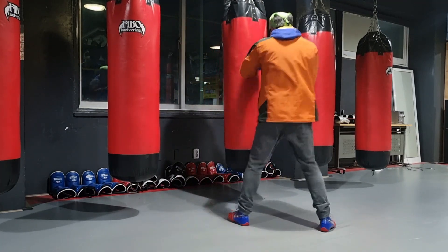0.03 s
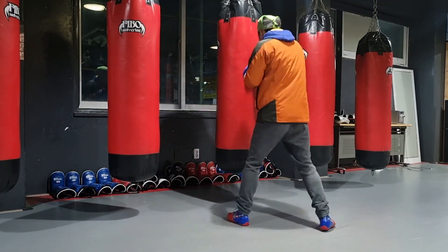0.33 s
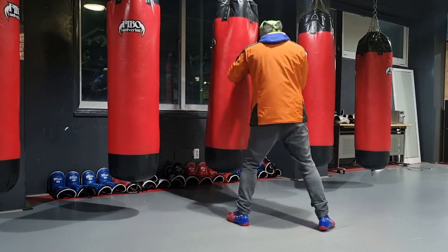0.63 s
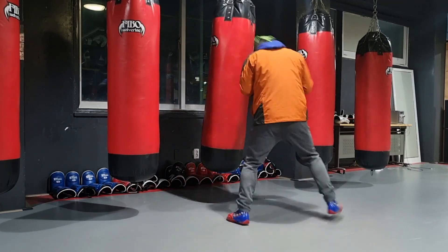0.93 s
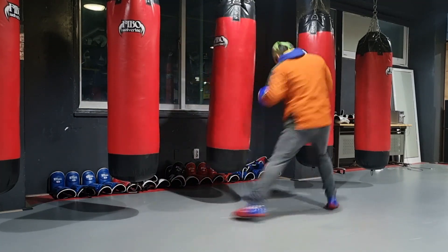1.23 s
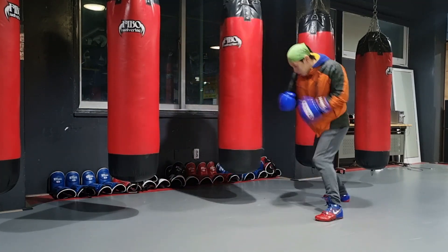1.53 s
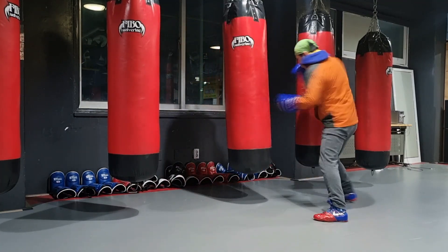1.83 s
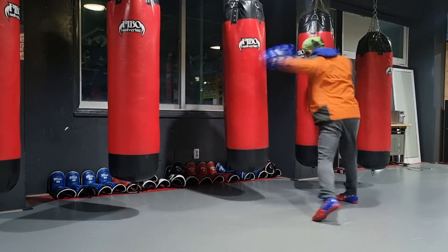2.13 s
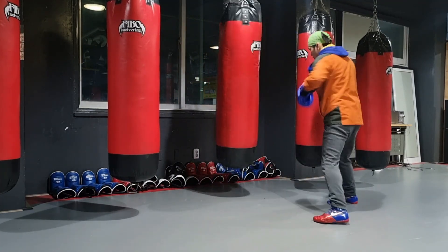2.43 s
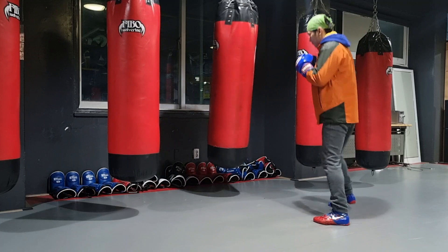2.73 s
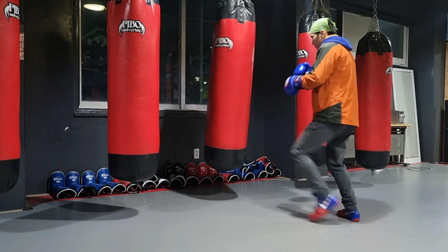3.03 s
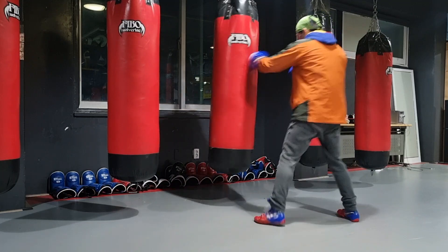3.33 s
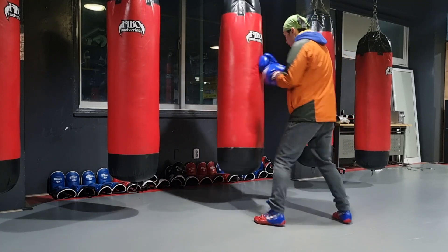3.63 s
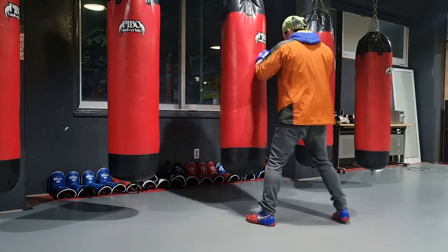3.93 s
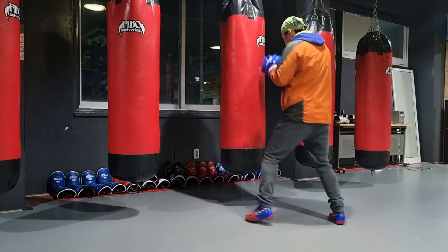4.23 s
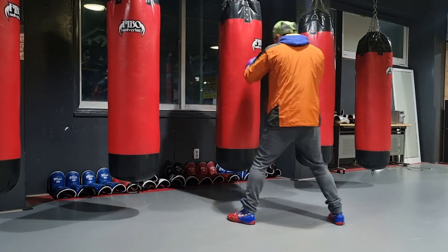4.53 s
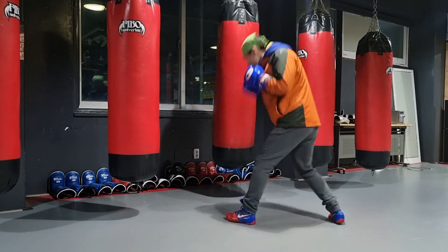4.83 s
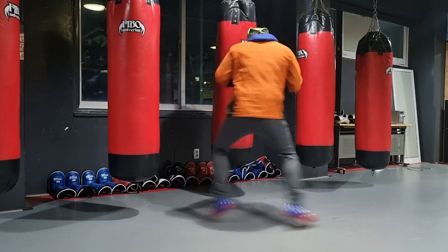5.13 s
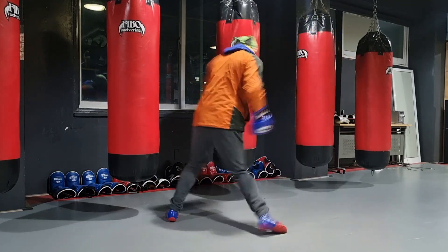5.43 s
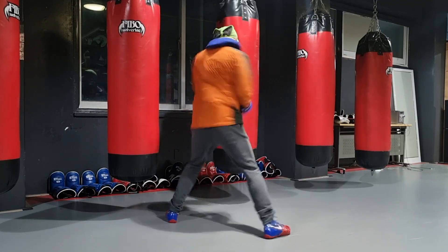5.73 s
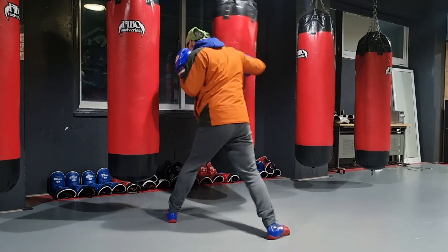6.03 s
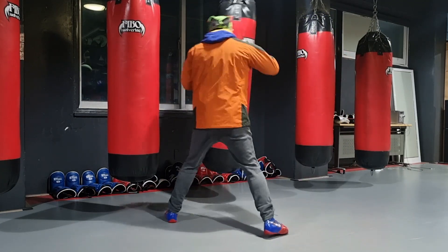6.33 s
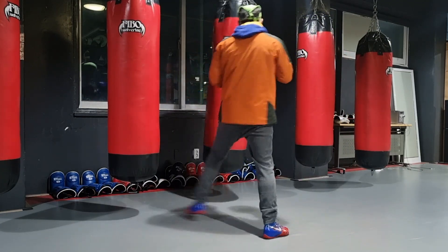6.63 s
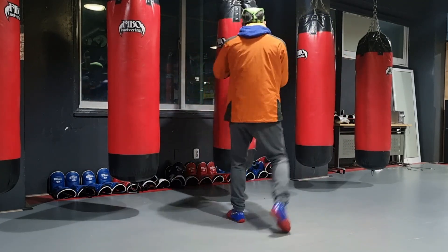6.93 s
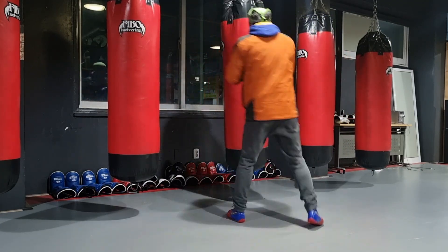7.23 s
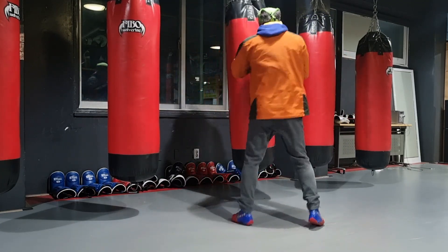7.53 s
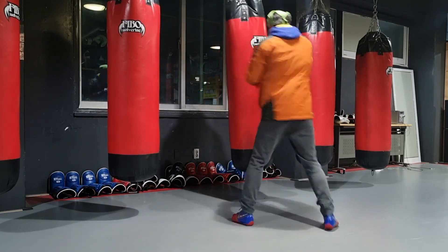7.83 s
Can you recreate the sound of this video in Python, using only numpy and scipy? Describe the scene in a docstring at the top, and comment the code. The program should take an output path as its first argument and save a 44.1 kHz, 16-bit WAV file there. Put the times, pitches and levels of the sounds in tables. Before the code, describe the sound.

A boxer works a hanging heavy bag in an empty gym. Three soft jabs lead to two hard punches, each a low thud with a vinyl slap and faint chain ring. More light jabs follow, then a loud step, a second hard pair and soft jabs to finish. Shoes tap and scuff and a jacket swishes between blows. The hall echoes, longest in the bass, over faint air noise.

```python
"""An empty gym: a boxer works a hanging heavy bag with light jabs and, twice, a pair of hard punches.
Each blow pushes a low thud out of the bag, slaps glove on vinyl and sets the chain ringing faintly;
the hall rings on, longest in the bass. Between blows his shoes tap and scuff on the floor and his
jacket swishes, over faint steady air noise."""
import sys
import numpy as np
from scipy import signal
from scipy.fft import rfft, irfft
from scipy.io import wavfile
from scipy.ndimage import uniform_filter1d

SR = 44100
rng = np.random.default_rng(int(sys.argv[2]) if len(sys.argv) > 2 else 0)


def persist_wave(psi):
    """Save psi, clipped to +-1, as 16-bit WAV."""
    counts = np.round(np.clip(psi, -1, 1) * 32767).astype(np.int16)
    wavfile.write(sys.argv[1], SR, np.atleast_2d(counts).T)


N = 355887
RING_SAMPLES = 2 * SR  # length of one blow
T = np.arange(RING_SAMPLES) / SR

# sole friction spectrum: freq_hz, density_db
SCUFF_SPECTRUM = [(150, -27.5), (350, 1.5), (650, 1.5), (1100, -3.5), (2200, -9), (4000, -16.5),
                  (8000, -25)]
# cloth friction spectrum: freq_hz, density_db
CLOTH_SPECTRUM = [(1200, -5.5), (3000, 0), (6000, -4), (9000, -4), (11300, -7.5), (13000, -2.5),
                  (16000, -6.5)]


def gain(db):
    """Decibels to amplitude factor."""
    return 10 ** (np.asarray(db) / 20)


def unit_rms(x):
    """Scale to rms 1."""
    return x / np.sqrt(np.mean(x ** 2) + 1e-20)


def at_level(x, db):
    """Scale so the first 0.1 s has this rms level."""
    return gain(db) * x / np.sqrt(np.mean(x[..., :SR // 10] ** 2) + 1e-20)


def lookup(points, hz):
    """Interpolate a table over log frequency."""
    points_hz, values = np.transpose(points)
    return np.interp(np.log(hz + 1), np.log(points_hz + 1), values)


def add(mix, start_s, sound):
    """Add a stereo sound into the mix."""
    part = mix[:, max(round(start_s * SR), 0):][:, :sound.shape[1]]
    part += sound[:, :part.shape[1]]


def convolve(x, response):
    """Convolve, keeping the length of x."""
    x = np.atleast_2d(x)
    return signal.fftconvolve(x, np.atleast_2d(response), axes=1)[:, :x.shape[1]]


def colour(x, spectrum, size=2048):
    """Minimum-phase filter; falls 10 dB per octave beyond the table."""
    hz = abs(np.fft.fftfreq(size, 1 / SR)) + 1
    octaves_out = np.log2(hz / np.clip(hz, spectrum[0][0], spectrum[-1][0]))
    log_gain = np.log(gain(lookup(spectrum, hz) - 10 * abs(octaves_out)))
    response = np.fft.ifft(np.exp(np.conj(signal.hilbert(log_gain)))).real
    return signal.oaconvolve(x, response[None], axes=1)[:, :x.shape[1]]


def diffuse(samples):
    """White noise from all around: left and right alike only in the bass."""
    # left-right likeness: freq_hz, correlation
    likeness = [(40, 1), (120, 0.96), (250, 0.85), (500, 0), (1000, 0), (3000, 0)]
    a, b = rfft(rng.standard_normal((2, samples)))
    correlation = lookup(likeness, np.fft.rfftfreq(samples, 1 / SR))
    mid, side = a * np.sqrt((1 + correlation) / 2), b * np.sqrt((1 - correlation) / 2)
    return irfft([mid + side, mid - side], samples)


def room_air(level_db=-58):
    """Steady air noise of the hall."""
    # air noise spectrum: freq_hz, density_db
    spectrum = [(15, -44), (25, -6), (96, 2.5), (148, -7), (378, -7), (848, -15), (1140, -13),
                (2120, -18.5), (3090, -21.5), (9300, -32.5), (11200, -39), (12500, -32), (15500, -34)]
    return gain(level_db) * unit_rms(colour(diffuse(N), spectrum))


def tail_fade(t, t60_s, steepening=1.092):
    """The reverberant tail fades, its decay steepening slightly as it dies."""
    return np.exp(-np.log(1000) * (t / t60_s) ** steepening)


def hall_tail(build_up_s):
    """Diffuse echoes, each band dying at its own rate."""
    # reverberation time: freq_hz, t60_s
    decay_times = [(40, 2.6), (90, 1.59), (200, 1.45), (300, 1.35), (420, 0.81), (600, 0.61), (1500, 0.93),
                   (3000, 0.8), (6000, 0.69), (10000, 0.48), (16000, 0.58)]
    # tail colour: freq_hz, gain_db
    spectrum = [(40, 7.6), (100, 7.7), (170, 7.35), (260, 7.2), (600, 1.5), (1100, 1.9), (2200, 4),
                (6000, 5.7), (15000, 1.5)]
    hz, t, bands = signal.stft(diffuse(RING_SAMPLES), SR, nperseg=1024)
    t60_s = lookup(decay_times, hz)[:, None]
    fade = tail_fade(t, t60_s) * np.sqrt(10 / (t60_s * SR))  # about unit energy per band
    bands = bands * fade * gain(lookup(spectrum, hz))[:, None]
    tail = signal.istft(bands, SR, nperseg=1024)[1][:, :RING_SAMPLES]
    return tail * (1 - np.exp(-(T / build_up_s) ** 2))


def in_hall(x, tail, wet_db, left_lag_s=0.00036):
    """Direct sound, right side first, plus the hall."""
    direct = np.array([np.roll(x, round(left_lag_s * SR)), x])
    return direct + gain(wet_db) * convolve(x, tail)


def rubbing(spectrum, grain_db):
    """Friction noise in small uneven catches."""
    catches = unit_rms(uniform_filter1d(rng.standard_normal(N), 130))
    return unit_rms(colour(diffuse(N) * gain(grain_db * catches), spectrum))


def footwork(tail, grip_s=0.012, load_s=0.044, cloth_db=-10):
    """Soles grip, body weight follows; the jacket swishes with each step and sleeve sweep."""
    # a foot lands and slides to rest: start_s, scuff_db, weight_db, settle_s
    steps = [(0.98, -59, -62, 0.24), (1.175, -52.5, -50.5, 0.21), (1.5, -48.5, -62, 0.24),
             (1.554, -48, -37.5, 0.19), (3.01, -55.5, -58, 0.12), (4.93, -58, -74, 0.51),
             (5.309, -46.5, -56, .08), (5.384, -44, -40.5, 0.17), (6.905, -59, -60, 0.16)]
    # sleeve sweeps: centre_s, level_db, half_width_s
    sleeves = [(0.034, -63.5, 0.046), (0.92, -68, .05), (1.345, -69, 0.044), (1.65, -52.5, 0.04),
               (2.226, -44.5, 0.033), (2.388, -43.5, 0.085), (3.046, -57, 0.019), (4.1, -59, 0.034),
               (4.385, -58.5, 0.033), (4.805, -71, 0.045), (5.175, -58.5, 0.036), (5.512, -45.5, 0.021),
               (6.05, -58, 0.028), (6.634, -60.5, 0.036)]
    # loaded floor spectrum: freq_hz, density_db
    floor_spectrum = [(25, -32), (50, 1), (85, 0.5), (130, -7.5), (260, -7), (450, -20)]
    t, scuff, weight = np.arange(N) / SR, np.zeros(N), np.zeros(N)
    for start_s, scuff_db, weight_db, settle_s in steps:
        age_s = np.maximum(t - start_s, 0)
        settling = np.exp(-age_s / settle_s)
        scuff += gain(scuff_db) * (1 - np.exp(-age_s / grip_s)) * settling
        weight += gain(weight_db) * (1 - np.exp(-age_s / load_s)) * settling
    sweeps = sum(gain(db) * np.exp(-((t - centre_s) / half_width_s) ** 2)
                 for centre_s, db, half_width_s in sleeves)
    soles = weight * rubbing(floor_spectrum, grain_db=1.5) + scuff * rubbing(SCUFF_SPECTRUM, grain_db=1)
    jacket = (gain(cloth_db) * scuff + sweeps) * rubbing(CLOTH_SPECTRUM, grain_db=3.5)
    return soles + jacket + gain(-5) * convolve(jacket, tail)


def squeaks(tail, waver=0.034):
    """Rubber, vinyl and chain links stick and slip in brief wavering whistles."""
    # stick-slip events: start_s, pitch_hz, level_db, length_s, wet_db
    slips = [(1.026, 5140, -59, 0.011, -19), (1.438, 14200, -70, 0.034, -8),
             (2.743, 9260, -55, 0.011, -4.5), (3.428, 4740, -33.5, 0.0013, -21),
             (5.506, 6260, -39.5, 0.0096, -16), (6.509, 9470, -63.5, 0.016, 1)]
    mix, t = np.zeros((2, N)), T[:SR // 2]
    for start_s, pitch_hz, level_db, length_s, wet_db in slips:
        jitter = unit_rms(uniform_filter1d(rng.standard_normal(len(t)), 20))
        phase = 2 * np.pi * np.cumsum(pitch_hz * (1 + waver * jitter)) / SR
        whistle = np.exp(-((t - length_s) / length_s) ** 2) * np.sin(phase)
        add(mix, start_s, gain(level_db) * in_hall(whistle, tail, wet_db))
    return mix


def contact(decay_s, snap=5.6):
    """One snap, then a dying spray of tiny impacts; flat spectrum."""
    t = T[:4096]
    envelope = np.exp(-t / decay_s) * (1 - np.exp(-t * 10 / decay_s))
    x = rng.standard_normal(len(t)) * envelope
    for _ in range(4):  # impose envelope and flat spectrum in turn
        x = x * envelope / np.sqrt(abs(uniform_filter1d(x ** 2, 64)) + 1e-12)
        x[10] -= snap
        x = irfft(np.exp(1j * np.angle(rfft(x))))
    return np.pad(x * np.exp(-(t / (6 * decay_s)) ** 2), (0, RING_SAMPLES - len(t)))


def taps(tail, tap_trim_db=-10, tick_trim_db=-13):
    """Light contacts of shoes, gloves and bag: a dull tap under a bright tick."""
    # contacts, before trim: start_s, tick_db, tap_db
    touches = [(1.037, -50.5, -49.5), (1.172, -48, -43.5), (1.495, -55, -48), (1.5576, -46, -42.5),
               (2.221, -43, -35.5), (3.4286, -42, -40.5), (3.667, -52, -59), (3.9603, -50.5, -50),
               (4.2076, -50, -50.5), (4.3844, -52, -50), (4.5486, -45.5, -42.5), (5.151, -50, -49.5),
               (5.312, -47, -42.5), (5.3931, -32, -34), (6.911, -54, -49.5), (7.3314, -53, -54),
               (7.414, -51, -53), (7.6006, -48, -51)]
    # tap and tick spectra: freq_hz, density_db
    tap_spectrum = [(150, -22.5), (350, -0.5), (600, 3.5), (1200, -7.5), (2500, -18), (5000, -24)]
    tick_spectrum = [(1500, -30), (3200, 10), (5000, 6.5), (7000, 2.5), (11000, -5.5), (13000, -11),
                     (16000, 0.5)]
    mix = np.zeros((2, N))
    for start_s, tick_db, tap_db in touches:
        touch = contact(decay_s=0.00207)[:SR // 2]
        tap = colour(in_hall(touch, tail, wet_db=5), tap_spectrum)
        tick = colour(in_hall(touch, tail, wet_db=0.5), tick_spectrum)
        add(mix, start_s, at_level(tap, tap_db + tap_trim_db) + at_level(tick, tick_db + tick_trim_db))
    return mix


def fittings():
    """Chain and bracket ring, with random strength and phase per blow."""
    # metal modes: pitch_hz, relative_db, t60_s
    modes = [(2045, -7, 0.45), (2550, -21, 1), (2520, -20.5, 0.95), (2590, -31, .8), (2660, -13.5, 0.31),
             (2965, -8, 0.38), (3020, -17, 0.87), (3250, -23, 0.59), (3340, -14, 0.5), (9150, -20, 0.46),
             (13400, -23, .4)]
    t, ring = T[:SR], np.zeros((2, SR))
    for pitch_hz, relative_db, t60_s in modes:
        phase_cycles, strength = rng.random((2, 1)), 0.5 + rng.random()
        envelope = strength * gain(relative_db) * np.exp(-np.log(1000) * t / t60_s)
        ring += envelope * np.sin(2 * np.pi * (pitch_hz * t + phase_cycles))
    return ring


def squeezed_air(lead_s=0.028, rise_s=0.0061):
    """Air hisses out between glove and bag, swelling until they meet."""
    t = T[:round(lead_s * SR)]
    hiss = colour(diffuse(len(t)), CLOTH_SPECTRUM) + 3 * colour(diffuse(len(t)), SCUFF_SPECTRUM)
    return unit_rms(hiss) * np.exp((t - lead_s) / rise_s)


def air_pop(x, pitch_hz, width_hz=217):
    """Air trapped between glove and bag resonates briefly."""
    b, a = signal.iirpeak(pitch_hz, pitch_hz / width_hz, fs=SR)
    return signal.lfilter(b, a, signal.lfilter(b, a, x))


def bag_push(pitch_hz, swell_s, delay_s):
    """The bag's skin caves in, then bulges out in a few dying swings."""
    return np.sin(2 * np.pi * pitch_hz * (T - delay_s)) * T / swell_s * np.exp(1 - T / swell_s)


def bag_thud(tail, mode_rise_s=0.024):
    """The bag's low push, reflected by walls and held by standing waves."""
    # wall reflections: delay_s, gain_db
    walls = [(0.03, -13), (0.052, -8.5), (0.063, -6), (0.081, -3)]
    # standing waves of the hall: pitch_hz, level_db, t60_s
    modes = [(55.4, -22, 3.4), (61.5, -16, 2.95), (77.7, -20, 2), (95.5, -15.5, 1.8), (103.8, -21.5, 1.2),
             (169.2, -29.5, 1.3), (253, -36.5, 2)]
    # thud colour: freq_hz, gain_db
    spectrum = [(25, -10), (50, -1), (90, 1), (125, -0.5), (165, 0), (230, 4.5), (500, -3)]
    push = bag_push(pitch_hz=92.5, swell_s=0.0055, delay_s=0.0042)
    echoes = sum(gain(db) * np.interp(T - delay_s, T, push, left=0) for delay_s, db in walls)
    standing = sum(gain(db) * tail_fade(T, t60_s) * np.sin(2 * np.pi * hz * (T - 0.003))
                   for hz, db, t60_s in modes)
    standing *= 1 - np.exp(-T / mode_rise_s)
    return colour(in_hall(push, tail, wet_db=-2.5) + echoes + standing, spectrum)


def punch(slap_db, contact_s, thud_db, pop_hz, pop_db, wet_db, full_blow_db=-24.5, quick_s=0.0021):
    """The bag heaves and thuds, padding knocks, trapped air pops, vinyl slaps and cracks."""
    # padding knock, vinyl slap and crack spectra: freq_hz, density_db
    knock_spectrum = [(110, -30), (155, -4), (200, 0), (260, 0.5), (340, -3.5), (500, -3), (750, -7),
                      (1100, -23), (2500, -52)]
    slap_spectrum = [(450, -29), (800, -9.5), (1050, 3), (1400, 3.5), (2200, -2.5), (2580, -0.5),
                     (2900, -3), (3400, -2.5), (4500, -5.5), (6000, -11.5), (8000, -33.5), (14000, -48.5)]
    crack_spectrum = [(3000, -37), (5000, -6.5), (6500, 0.5), (9000, 3), (11500, 0.5), (12700, 6),
                      (14000, 2), (16000, -4)]
    # reflections off floor and neighbouring bags: delay_s, gain_db
    nearby = [(.0075, -6.5), (0.0143, -3)]
    effort_db = slap_db - full_blow_db
    heave_db = -28.5 + 1.4 * effort_db  # light blows lose heave faster than slap
    knock_db = -24 + 1.084 * effort_db + 0.46 * (thud_db - slap_db)  # follows both slap and thud
    crack_db = slap_db - 4.5 - 3.5 * np.log2(contact_s / quick_s)  # quick contact cracks harder
    tail = hall_tail(build_up_s=0.00075)
    touch = contact(contact_s, snap=4.38)
    skin = in_hall(touch, tail, wet_db)
    for delay_s, gain_db in nearby:  # curved surfaces scatter differently to each side
        scatter = np.array([contact(2 * contact_s, snap=0) for side in range(2)])
        add(skin, delay_s, gain(gain_db) * scatter)
    heave = in_hall(bag_push(pitch_hz=48.5, swell_s=0.012, delay_s=0.0025), tail, wet_db=-0.5)
    bass = at_level(heave, heave_db) + at_level(bag_thud(tail), thud_db)
    knock = at_level(colour(skin, knock_spectrum), knock_db)
    pop = at_level(air_pop(in_hall(touch, tail, wet_db=-3.5), pop_hz), pop_db)
    slap = at_level(colour(skin, slap_spectrum), slap_db)
    crack = at_level(colour(skin, crack_spectrum), crack_db)
    lean_left, lean_right = gain([[1.1], [-1.1]]), gain([[-0.9], [0.9]])
    return bass * lean_left + knock + pop + slap + crack * lean_right


def punches(puff_db=-5, side_on_s=(1.5, 3.6), open_wet_db=-0.1, screened_wet_db=3):
    """Each blow: a puff of air, the punch, the ring of the fittings."""
    # glove on bag (the row at 7.083 s is a heavy foot landing, played the same way): start_s, slap_db,
    # contact_s, thud_db, pop_hz, pop_db
    blows = [(0.141, -47.5, 0.0039, -42.5, 972, -48), (0.398, -52, .0055, -42.5, 1620, -65),
             (0.677, -53, 0.0072, -54.5, 828, -53.5), (1.861, -23, 0.0024, -21.5, 1110, -36),
             (2.2783, -24.5, .002, -19.5, 563, -38), (3.462, -47.5, 0.0045, -43, 1800, -56),
             (3.732, -50, 0.002, -41, 555, -52.5), (3.986, -55, .0048, -50, 1850, -64),
             (4.252, -53.5, 0.0078, -46, 1240, -61), (4.555, -53.5, 0.0071, -56.5, 536, -55),
             (5.686, -22.5, 0.0014, -25.5, 1755, -42), (6.0966, -26, 0.0029, -18, 870, -30),
             (7.083, -52.5, 0.0089, -45.5, 1104, -54.5), (7.368, -54, 0.0059, -41.5, 521, -54),
             (7.675, -46.5, 0.007, -43, 1165, -53), (7.948, -52.5, 0.0036, -43, 1160, -68)]
    mix = np.zeros((2, N))
    for start_s, slap_db, *blow in blows:
        # the boxer's back screens the bag unless he works side-on
        wet_db = open_wet_db if side_on_s[0] < start_s < side_on_s[1] else screened_wet_db
        puff = gain(slap_db + puff_db) * squeezed_air()
        add(mix, start_s - puff.shape[1] / SR, puff)
        add(mix, start_s, punch(slap_db, *blow, wet_db))
        add(mix, start_s, gain(slap_db) * fittings())
    return mix


def scene():
    """The boxer in the hall, over its air noise."""
    tail = hall_tail(build_up_s=0.002)
    return room_air() + punches() + taps(tail) + squeaks(tail) + footwork(tail)


def record(dry, cutoff_hz=16000):
    """Soft clip, then low-pass."""
    low_pass = signal.firwin(301, cutoff_hz, window=("kaiser", 9), fs=SR)
    return signal.oaconvolve(np.tanh(dry), low_pass[None], "same")


dry = scene()
out = record(dry)
persist_wave(out)
```